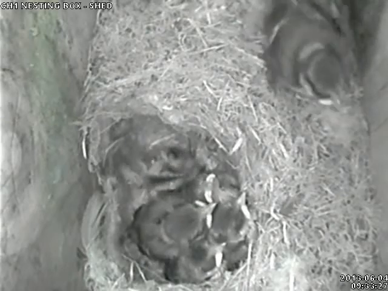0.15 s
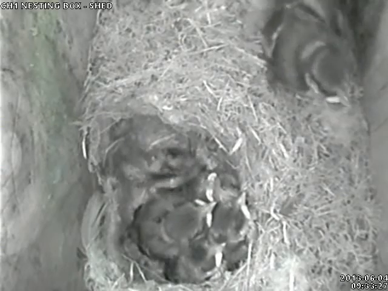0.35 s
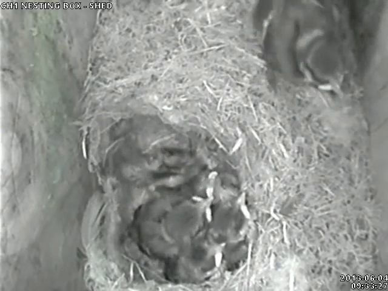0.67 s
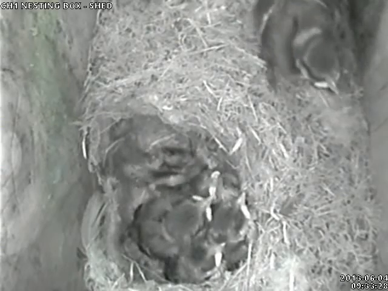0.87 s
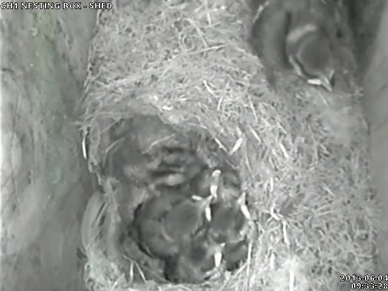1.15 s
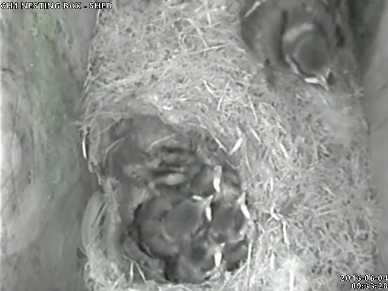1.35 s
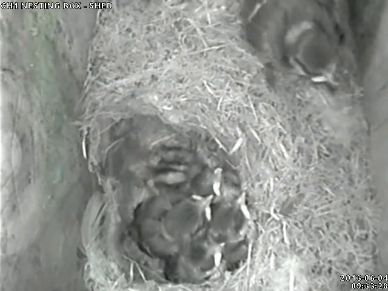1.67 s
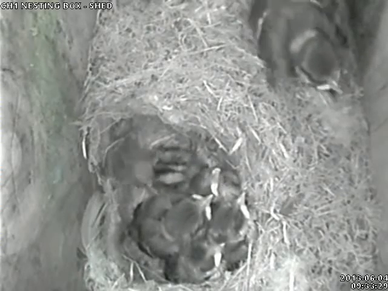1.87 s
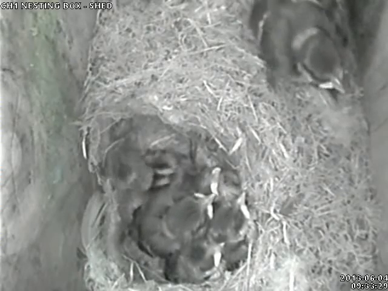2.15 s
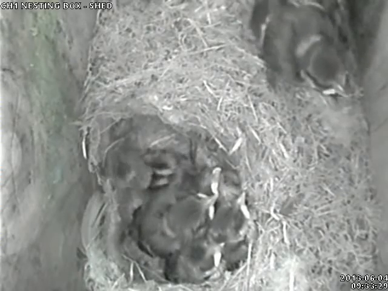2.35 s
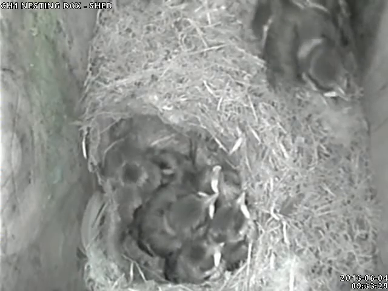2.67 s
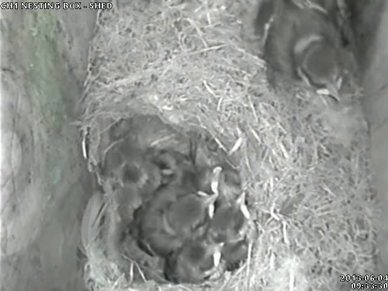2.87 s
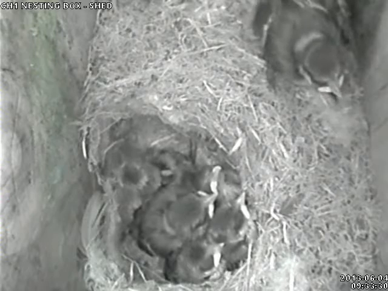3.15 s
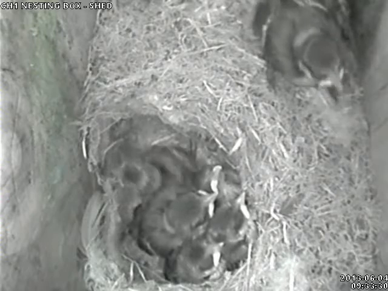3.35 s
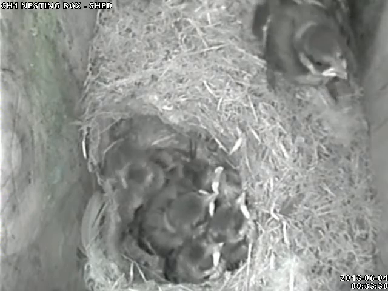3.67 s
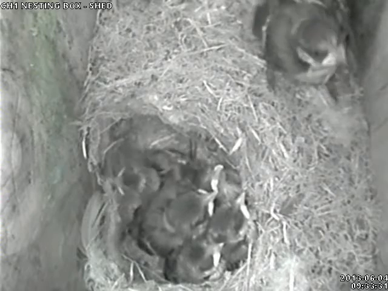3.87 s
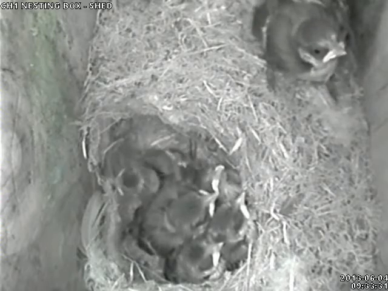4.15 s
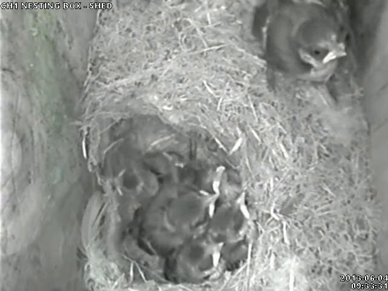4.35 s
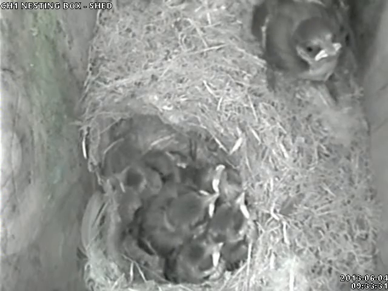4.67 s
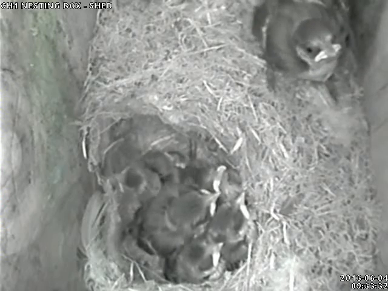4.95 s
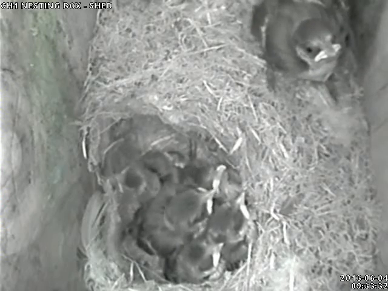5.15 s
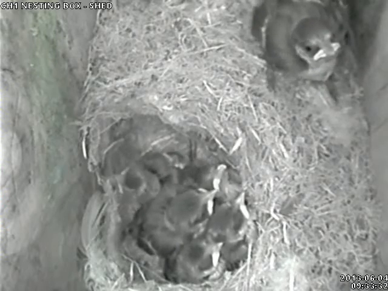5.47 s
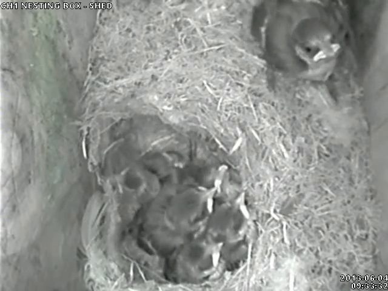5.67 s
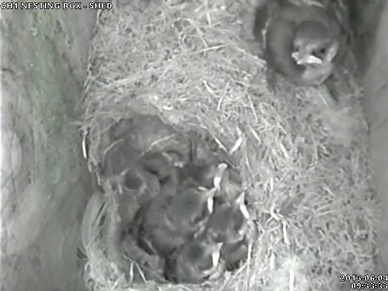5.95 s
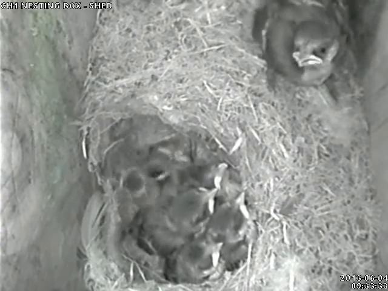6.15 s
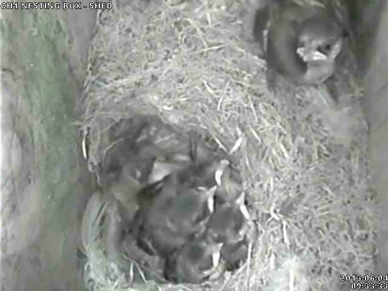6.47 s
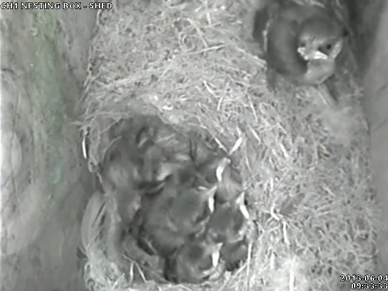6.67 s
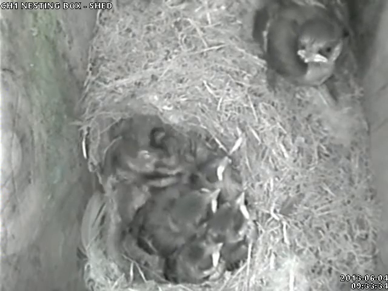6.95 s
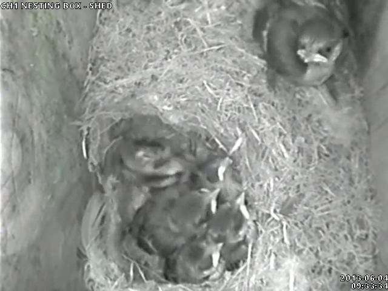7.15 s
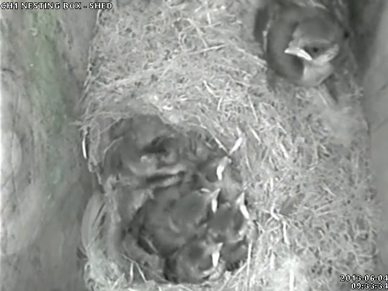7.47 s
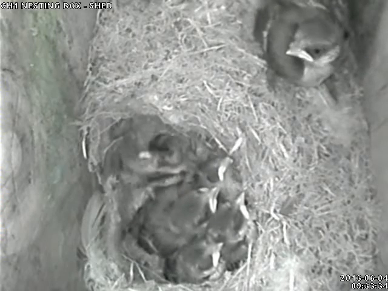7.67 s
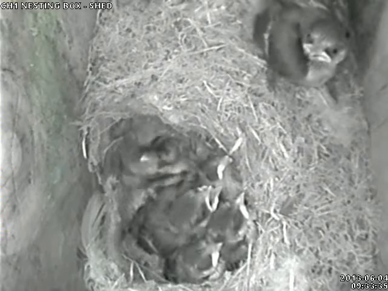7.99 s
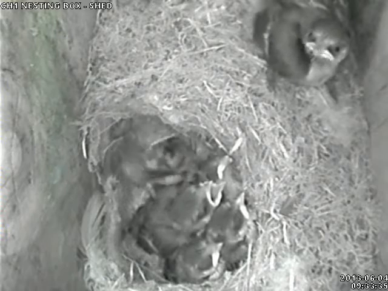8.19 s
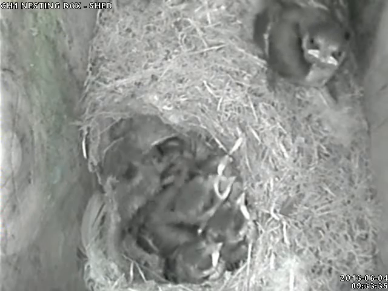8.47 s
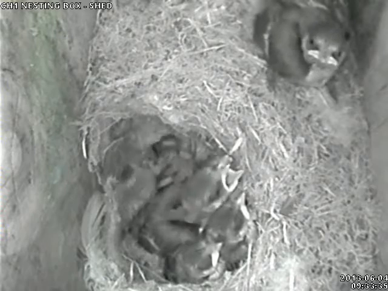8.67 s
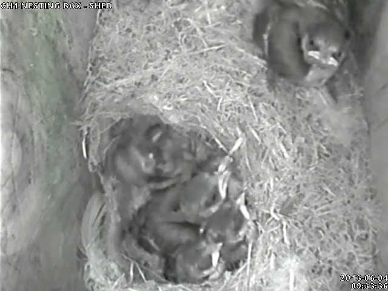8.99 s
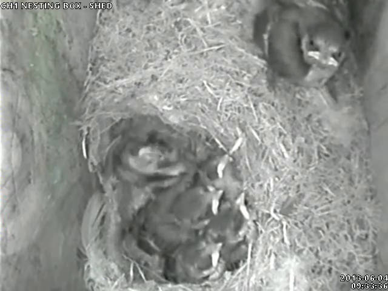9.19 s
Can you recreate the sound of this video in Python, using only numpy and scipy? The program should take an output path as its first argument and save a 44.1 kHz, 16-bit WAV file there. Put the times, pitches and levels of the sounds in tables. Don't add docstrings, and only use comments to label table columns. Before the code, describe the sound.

Hoarse chick calls and thin piping peeps come in clusters close to a buzzing little microphone, with faint coos and late bird trills beyond.

```python
import sys
import numpy as np
from scipy import signal
from scipy.fft import rfft, irfft
from scipy.io import wavfile
from scipy.ndimage import uniform_filter1d

SR = 44100
rng = np.random.default_rng(int(sys.argv[2]) if len(sys.argv) > 2 else 0)


def output_pcm(signal):
    pcm = np.clip(np.atleast_2d(signal).T, -1, 1) * 32767
    wavfile.write(sys.argv[1], SR, np.round(pcm).astype(np.int16))


def volts_from_db(level):
    exponent = np.asarray(level, float) / 20
    return 10 ** exponent


N = 411012

# centre_hz, width_hz, level_db
BOX = [(864, 133, 6), (1045, 170, 0.5), (1309, 210, 1.5), (1700, 430, -7), (8500, 4100, -12),
       (8600, 710, -17.5)]
# centre_hz, width_hz, level_db
THROAT = [(3400, 280, 0), (3950, 300, 0), (4450, 280, -3), (4870, 260, 0), (5430, 440, -5)]
# centre_hz, width_hz, level_db
BEAK = [(6280, 420, -3), (7050, 400, 0), (7680, 450, -5)]
# start_s, length_s, effort_db, beak_hiss_db, gape_hz (centre of the throat hiss)
HOARSE = [(0, 0.072, -55.5, -57.5, 3640), (0.146, 0.077, -53, -56.5, 3760), (0.291, 0.096, -52, -52, 3880),
          (0.422, 0.1, -51.5, -53, 4200), (0.572, 0.12, -53.5, -55, 4090), (1.073, 0.043, -58.5, -57, 3620),
          (1.823, 0.068, -59.5, -59, 3550), (1.999, 0.041, -58, -56, 3760),
          (2.218, 0.064, -59, -56.5, 3800), (2.43, 0.056, -53.5, -60, 4730),
          (3.049, 0.076, -54.5, -56.5, 3670), (3.439, 0.082, -57, -57.5, 3800),
          (3.619, 0.08, -52.5, -53, 4040), (3.751, 0.076, -50, -50.5, 4200), (3.887, 0.11, -50, -58, 4100),
          (5.432, 0.052, -54.5, -57.5, 4070), (6.161, 0.071, -52, -53.5, 4300),
          (6.303, 0.082, -50, -51, 4200), (6.439, 0.074, -49, -50, 4430), (6.593, 0.099, -48, -51, 4470),
          (7.828, 0.075, -55, -60.5, 4300), (7.993, 0.087, -50.5, -52.5, 4250),
          (8.123, 0.089, -51, -54, 4200), (8.271, 0.11, -52.5, -54.5, 4280)]
# start_s, length_s, middle_hz, level_db, squeak_db
GROPES = [(1.006, 0.019, 4860, -37, -41), (1.175, 0.046, 4410, -42, -48), (1.446, 0.036, 4500, -41.5, -46),
          (2.633, .045, 4770, -43, -50), (2.836, .053, 4800, -43, -48), (3.101, 0.039, 4810, -38.5, -49),
          (4.077, 0.034, 4790, -38, -66), (4.252, 0.041, 4830, -41, -57), (4.561, 0.028, 4840, -40, -49),
          (4.839, 0.012, 4860, -33, -51), (6.838, 0.02, 5000, -40.5, -51.5), (7.123, 0.014, 4870, -40, -53)]
# start_s, length_s, pitch_hz, level_db
HOLDS = [(1.212, 0.03, 4890, -37), (1.478, 0.041, 4824, -35), (2.677, 0.014, 5000, -39.5),
         (2.897, 0.015, 4780, -34), (3.132, 0.045, 5010, -39), (4.097, 0.027, 5110, -42),
         (4.289, 0.038, 4870, -34.5), (4.596, 0.025, 4850, -36.5), (4.858, 0.043, 4940, -36),
         (6.857, 0.059, 4900, -34), (7.135, 0.014, 4870, -33.5), (7.147, 0.05, 4920, -34.5)]
# start_s,
# length_s, first_hz, last_hz, level_db
SLIDES = [(2.033, .021, 3300, 3330, -53), (2.055, .013, 4050, 3200, -54), (.033, .022, 3350, 3300, -53),
          (2.462, .012, 4400, 6000, -44), (3.482, .022, 3300, 3330, -52), (3.796, .017, 3700, 7400, -40),
          (3.478, .025, 7550, 6950, -48), (.453, .034, 7200, 6850, -44), (4.129, .011, 6600, 6450, -63),
          (4.142, .024, 6270, 6230, -59), (4.126, .01, 4500, 3900, -56), (5.46, .02, 4000, 3200, -58),
          (6.492, .017, 3600, 7600, -39), (6.2, .024, 4600, 3700, -50), (7.865, .024, 3750, 3430, -54),
          (6.667, .013, 6100, 6900, -45.5), (.245, .025, 5900, 6200, -63), (6.083, .014, 6400, 6200, -62),
          (7.886, .021, 3800, 3500, -55), (8.185, .014, 3700, 5500, -46), (8.04, .026, 4100, 3700, -48),
          (8.297, .053, 7150, 6800, -45), (8.31, .05, 3550, 3300, -52), (4.817, .027, 3600, 3750, -54),
          (4.82, .02, 4450, 4550, -55), (.31, .045, 3400, 3250, -54), (.445, .05, 3450, 3280, -53),
          (5.44, .02, 4600, 4100, -56)]
GAPE_MID_HZ = 4100
ATTACK, RELEASE = 0.19, 0.13
BUZZ_DEPTH = 0.25


def level(x, db):
    return x * volts_from_db(db) / np.sqrt(np.mean(x ** 2))


def noise():
    return rng.standard_normal(N)


def ring(x, modes):
    out = 0
    for hz, width, db in modes:
        sos = signal.butter(2, [hz - width / 2, hz + width / 2], "bandpass", fs=SR, output="sos")
        out = out + volts_from_db(db) * signal.sosfilt(sos, x) / np.sqrt(width)
    return out


def wander(rate):
    k = int(SR / rate)
    return level(uniform_filter1d(uniform_filter1d(noise(), k), k), 0)


def colour(points):
    hz, db = np.transpose(points)
    bins = np.fft.rfftfreq(N, 1 / SR) + 1
    return irfft(rfft(noise()) * volts_from_db(np.interp(np.log(bins), np.log(hz), db)), N)


def add(track, start, piece):
    a = max(start, 0)
    piece = piece[..., a - start:N - start]
    track[..., a:a + piece.shape[-1]] += piece


def background():
    # pitch_hz, density_db
    floor = [(12, -50), (20, -19.5), (33, -31), (201, -15.5), (320, -30), (455, -29), (597, -33),
             (827, -32), (1500, -37.5), (4000, -43), (7070, -38.5), (7880, -33), (13200, -64.5)]
    # time_s, level_db
    traffic = [
        (0.0, -60),
        (2.44, -60),
        (6.5, -60.5),
        (8.2, -56),
        (8.9, -55),
        (9.32, -57),
    ]
    # time_s, over_ticking_db
    rustles = [
        (.141, 14),
        (7.57, 10),
        (7.785, 8),
        (9.09, 9),
        (9.24, 14),
    ]
    t = np.arange(N) / SR
    road = level(ring(noise(), [(145, 135, -1.5), (174, 101, 1.5), (249, 118, -11.5)]), 0)
    rumble = road * volts_from_db(np.interp(t, *np.transpose(traffic)) - 3)
    lorry = level(ring(noise(), [(71, 34, 0)]), -66) * volts_from_db(-2.5 * np.clip(t - 4.4, 0, 3.2))
    stir = volts_from_db(5 * np.abs(wander(30)))
    for moment, db in rustles:
        stir = stir + volts_from_db(db + 5) * np.exp(-((t - moment) / 0.01) ** 2)
    straw = level(ring(noise() * stir, BOX), -73.5)
    return level(colour(floor), -59.5) + lorry + rumble + straw


def camera():
    # pitch_hz, level_db
    hum_tones = [(50, -69), (200, -75), (300, -81), (350, -79.5), (450, -87)]
    # centre_hz, width_hz, level_db
    whine_bands = [(4090, 790, -70.5), (7580, 360, -75.5), (7920, 410, -75.5), (11470, 1950, -72)]
    t = np.arange(N) / SR
    hum = sum(np.sqrt(2) * volts_from_db(db) * np.sin(2 * np.pi * (hz * t + rng.random())) for hz, db in hum_tones)
    whine = sum(level(ring(noise(), [(hz, width, 0)]), db) for hz, width, db in whine_bands)
    count = N // 400
    scatter_db = 3.5 * np.tanh(rng.standard_normal(count))
    swing_db = 7 * (-1.0) ** np.arange(count)
    size = volts_from_db(scatter_db + swing_db)[(t * 100).astype(int)]
    place = t * 100 % 1
    sparks = size * np.exp(-((place - 0.52) / 0.08) ** 2) * noise()
    return hum + whine + level(ring(sparks, [(11500, 3200, 0)]), -75.5)


def calls():
    # start_s, length_s, effort_db, throat_db, beak_hiss_db
    piping = [(0.758, 0.029, -60, -58.5, -65), (1.004, 0.035, -51.5, -45.5, -60),
              (1.156, 0.09, -52, -46.5, -62), (1.431, 0.098, -50, -48.5, -68),
              (2.609, 0.093, -51, -49, -59.5), (2.815, 0.11, -50.5, -47, -63),
              (3.091, 0.078, -58.5, -57, -64), (4.058, 0.072, -53, -51.5, -67),
              (4.24, 0.081, -53.5, -49.5, -64), (4.546, 0.088, -54.5, -47, -68),
              (4.795, 0.11, -54, -52.5, -61), (6.805, 0.092, -58, -56, -65), (7.118, .053, -54.5, -54, -67)]
    # start_s, length_s, effort_db, hiss_db
    gasps = [
        (0.206, 0.072, -62, -71),
        (0.715, 0.04, -63.5, -64),
        (0.971, 0.025, -60, -62),
        (1.04, 0.049, -68, -63.5),
        (1.68, 0.017, -57.5, -68),
        (2.047, 0.024, -62, -63),
        (7.772, .024, -63, -72),
        (8.483, 0.052, -66, -69.5),
        (8.79, 0.014, -62, -72),
    ]
    rows = []
    for start, length, db, beak_db, gape_hz in HOARSE:
        throat_db = db - 1 + 1.5 * (gape_hz - GAPE_MID_HZ) / 1000
        rows.append((start, length, db, throat_db, beak_db, gape_hz, 0.14, False))
    for start, length, db, throat_db, beak_db in piping:
        waits = [(grope[0] + 0.0045 - start) / length for grope in GROPES if start < grope[0] < start + length]
        rows.append((start, length, db, throat_db, beak_db, 4600, max([0] + waits), True))
    for start, length, db, hiss_db in gasps:
        rows.append((start, length, db, hiss_db - 0.5, hiss_db, 4200, 0, False))
    return rows


def shape(u, start, stop, attack, crest, rise, hold):
    place = (u - start) / (stop - start)
    return level(np.interp(place, [0, attack, crest, 1 - RELEASE, 1], [0, rise, 1, hold, 0]), 0)


def shares(modes, centre_hz, spread_hz, db):
    return level(np.exp(-0.5 * ((np.array(modes)[:, 0] - centre_hz) / spread_hz) ** 2), db)


def breaths():
    box_shape, beak_shape = (0.63, 0.72, 0.84), (0.53, 0.48, 0.33)
    throat_shape, piping_shape = (0.75, 0.4, 0.8), (1, 0.9, 0.35)
    push = np.zeros((2 + len(BEAK) + len(THROAT), N))
    for start, length, box_db, throat_db, beak_db, gape_hz, wait, piper in calls():
        u = np.linspace(0, 1, int(length * SR))
        if piper:
            throat = shape(u, wait, 1, 0.028, *piping_shape)
        else:
            throat = shape(u, wait, 0.93, ATTACK, *throat_shape)
        beak = shape(u, 0.07, 0.9, ATTACK / 2, *beak_shape)
        beak_hz = 6850 + 1.1 * (gape_hz - GAPE_MID_HZ)
        throat_spread_hz = 600 * (1 + piper / 2)
        add(push, int(start * SR), np.vstack([
            volts_from_db(box_db) * shape(u, 0, 0.94, ATTACK, *box_shape),
            np.outer(shares(BEAK, beak_hz, 1200, beak_db), beak),
            np.outer(shares(THROAT, gape_hz, throat_spread_hz, throat_db - 5), throat),
            piper * volts_from_db(box_db - 9) * shape(u, 0, 0.97, ATTACK, *box_shape)]))
    return push


def buzz():
    return 2 * np.pi * np.cumsum(560 + 70 * wander(69.9)) / SR


def flutter(hz, db):
    pitch = hz + 80 * wander(55) + 70 * wander(500)
    return level(np.sin(2 * np.pi * np.cumsum(pitch) / SR) * volts_from_db(7 * np.tanh(wander(140))), db)


def rasps(push, beat):
    slaps = (rng.random(N) < 1500 / SR) * volts_from_db(10 * rng.random(N)) * np.sign(noise())
    source = level(slaps, 0) * volts_from_db(2.16 * wander(83))
    box = level(ring(source + 0.82 * noise(), BOX) * volts_from_db(1.2 * wander(80)), 0) * push[0]
    box = box + level(ring(source + noise(), [(1257, 570, 0)]), 0) * push[-1]
    breathy = source + 1.2 * noise()
    voice = level(ring(breathy, [(5650, 500, 0)]), -11) * push[1]
    for (hz, width, db), air in zip(BEAK + THROAT, push[1:]):
        hiss = level(ring(breathy, [(hz, 1.15 * width, 0)]), db - 4.5)
        voice = voice + (hiss + flutter(hz, db - 2.5)) * air
    return box + voice * (1 + BUZZ_DEPTH * np.cos(beat))


def beak_shuts():
    rows = []
    for start, length, db, _, gape_hz in HOARSE:
        end = start + length
        if not any(start < t < end and last > 1.3 * first for t, _, first, last, _ in SLIDES):
            shut_db = db - 3 - 15 * (gape_hz - GAPE_MID_HZ) / 1000
            rows.append((end - 0.011 - 0.005, 0.011, 4050, 3700, 3200, shut_db))
    return rows


def whistle_scraps():
    # start_s, length_s, pitch_hz, level_db
    beak_scraps = [(.028, 0.033, 7150, -53), (.187, 0.026, 6120, -47.5), (.323, 0.014, 7230, -50),
                   (.654, 0.0071, 6860, -53), (.481, 0.018, 6300, -44), (.614, 0.028, 6500, -51),
                   (.618, .034, 8260, -56), (.644, 0.028, 6240, -46), (.738, 0.029, 7100, -49),
                   (1.19, .037, 7330, -59), (1.452, 0.017, 7280, -48), (2.021, 0.033, 7000, -46.5),
                   (2.635, 0.012, 7260, -48), (3.653, 0.021, 6190, -44), (3.77, 0.051, 6130, -48.5),
                   (3.912, .043, 6000, -51), (3.913, 0.049, 7000, -49), (3.956, 0.023, 6300, -48),
                   (4.559, 0.028, 7140, -57), (6.322, 0.014, 6990, -46), (6.47, .016, 6970, -42),
                   (6.601, 0.039, 6100, -50), (6.613, 0.026, 7000, -44), (7.857, 0.039, 7420, -44.5),
                   (8.04, 0.024, 7010, -48), (8.147, 0.041, 6730, -43.5), (6.18, 0.042, 7600, -51),
                   (6.325, 0.039, 6150, -51), (7.094, 0.013, 7150, -53), (3.066, .03, 6250, -55),
                   (6.455, .03, 6100, -49), (2.45, .02, 7500, -50.5), (1.845, 0.037, 6220, -56),
                   (2.24, 0.031, 6260, -51), (.33, .03, 6450, -50), (.345, .012, 8300, -62),
                   (.487, .012, 8250, -61)]
    # start_s, length_s, pitch_hz, level_db
    throat_scraps = [(.315, 0.011, 4000, -52), (1.85, .02, 3750, -53), (2.24, 0.023, 3700, -53),
                     (.66, .012, 4650, -51), (0.169, 0.03, 4000, -44.5), (0.343, 0.014, 4050, -37.5),
                     (.489, 0.0091, 4050, -34.5), (.497, 0.011, 3540, -52), (0.615, 0.04, 4090, -44),
                     (0.624, 0.047, 3360, -51), (.765, 0.015, 5320, -41), (1.03, 0.011, 4020, -38),
                     (1.226, 0.0088, 4100, -39), (1.24, .011, 3860, -44), (1.507, 0.021, 4040, -39),
                     (2.463, .018, 5000, -42), (2.616, 0.038, 4820, -46.5), (2.694, 0.0048, 4020, -39),
                     (2.826, 0.021, 4880, -48), (2.908, 0.017, 3840, -48), (3.654, 0.023, 3950, -44),
                     (3.898, .019, 5070, -45), (3.927, 0.022, 4630, -52), (3.948, 0.033, 4450, -46),
                     (4.61, .02, 3990, -43.5), (6.355, 0.015, 4270, -42), (6.483, 0.022, 4700, -46),
                     (6.658, 0.016, 4480, -41.5), (8.184, 0.011, 4610, -40), (8.343, 0.019, 4520, -40.5),
                     (7.855, .01, 4800, -58), (8.042, 0.0089, 4800, -50), (8.056, 0.0088, 4800, -47),
                     (6.638, 0.015, 4700, -43), (8.34, .016, 5100, -58), (7.893, .007, 4800, -56)]
    rows = []
    for start, length, hz, db in beak_scraps + throat_scraps:
        drift = 50 * rng.standard_normal() - 45
        bend = 45 * rng.standard_normal() + 45
        rows.append((start, length, hz - drift - bend, hz + bend / 2, hz + drift - bend, db))
    return rows


def whistle_notes():
    squeak_s, squeak_hz, dip_hz = 0.024, 7250, 120
    squeaks = [(start + 0.006 - squeak_s, squeak_s, squeak_hz + dip_hz, squeak_hz - dip_hz,
                squeak_hz - dip_hz / 2, db, -9) for start, _, _, _, db in GROPES]
    gropes = [(start, length, 5280, hz, 4900, db, -7) for start, length, hz, db, _ in GROPES]
    arch_hz = 65
    holds = [(start, length, hz - 2 * arch_hz, hz + arch_hz, hz - arch_hz, db) for start, length, hz, db in HOLDS]
    slides = [(start, length, first, first + 0.44 * (last - first), last, db)
              for start, length, first, last, db in SLIDES]
    steady = holds + whistle_scraps() + slides + beak_shuts()
    return squeaks + gropes + [(*row, 0) for row in steady]


def whistles(push, beat):
    rough = np.clip(push[0] / volts_from_db(-50), 0, 1.3)
    for start, length, _, _ in HOLDS:
        rough[int(start * SR):int((start + length) * SR)] *= 0.5
    steep = [row for row in SLIDES if row[3] > 1.3 * row[2]]
    for start, length, *_ in GROPES + steep:
        span = slice(int(start * SR), int((start + length) * SR))
        rough[span] = np.maximum(rough[span], 1.1)
    shake_hz = 75 * rough * wander(450) + 14 * wander(150) + 130 * rough * np.sin(beat)
    shake_db = (0.5 + 4 * rough) * (np.tanh(wander(340)) - 0.5)
    out, ends, edge = np.zeros(N), [], int(0.003 * SR)
    for start, length, first, middle, last, db, swell_db in whistle_notes():
        a, n = int(start * SR), int(length * SR)
        i = np.arange(-edge, n + edge)
        u = np.clip(i / n, 0, 1)
        hz = first + (4 * middle - 3 * first - last) * u + 2 * (first + last - 2 * middle) * u ** 2
        phase = 2 * np.pi * np.cumsum(hz + shake_hz[np.clip(a + i, 0, N - 1)]) / SR
        for end, end_hz, end_phase in ends:
            if abs(end - a) < edge and abs(end_hz - first) < 300:
                phase += end_phase + 2 * np.pi * first * (a - end) / SR - phase[edge]
        ends.append((a + n, last, phase[edge + n]))
        fade = np.clip(np.minimum(i + edge, n + edge - i) / (2 * edge), 0, 1)
        swell = volts_from_db(swell_db * np.clip(1 - i / (0.01 * SR), 0, 1))
        add(out, a - edge, np.sqrt(2) * volts_from_db(db) * fade * swell * np.sin(phase))
    return out * volts_from_db(shake_db) * (1 + BUZZ_DEPTH * rough * np.cos(beat))


def pigeon():
    # start_s, length_s, held_hz, last_hz, level_db
    coos = [
        (4.53, .22, 470, 360, -68),
        (5.14, .19, 475, 420, -66),
        (5.42, .33, 465, 365, -67),
        (6.72, .1, 450, 490, -72),
        (7.44, .24, 480, 370, -67),
        (8.06, .16, 480, 440, -68),
        (8.4, .35, 460, 350, -70),
    ]
    out, waver = np.zeros(N), wander(30)
    for start, length, held_hz, last_hz, db in coos:
        u = np.linspace(0, 1, int(length * SR))
        hz = held_hz + (last_hz - held_hz) * u ** 2.5 + 6 * waver[int(start * SR):][:len(u)]
        fade = signal.windows.tukey(len(u), 0.2)
        add(out, int(start * SR), np.sqrt(2) * volts_from_db(db) * fade * np.sin(2 * np.pi * np.cumsum(hz) / SR))
    return out * volts_from_db(3 * wander(40) - 2)


def trills():
    # start_s, length_s, first_hz, last_hz, level_db
    trill_rows = [
        (5.17, .04, 6700, 6500, -70),
        (7.785, .02, 6800, 6500, -63),
        (8.07, .035, 7000, 6600, -64),
        (8.215, .06, 6450, 6750, -65),
        (8.512, .148, 6520, 7200, -65),
        (8.805, .115, 6550, 6900, -64),
        (9.1, .095, 6500, 6950, -65),
    ]
    out = np.zeros(N)
    for start, length, first, last, db in trill_rows:
        t = np.arange(int(length * SR)) / SR
        warble_hz = 230 * (0.38 + t / 0.14) * np.sin(2 * np.pi * 44 * t)
        hz = first + (last - first) * t / length - warble_hz
        fade = np.sin(np.pi * t / length) ** 0.5
        add(out, int(start * SR), np.sqrt(2) * volts_from_db(db) * fade * np.sin(2 * np.pi * np.cumsum(hz) / SR))
    return out * volts_from_db(2.5 * wander(90))


def scene():
    push, beat = breaths(), buzz()
    outside = background() + pigeon() + trills()
    chicks = rasps(push, beat) + whistles(push, beat)
    mid = outside + camera() + chicks
    side = level(ring(noise(), [(61.3, 24, 9), (170, 19, 4.5), (273, 39, -43)]), -72)
    return np.array([mid + side, mid - side])


def roll_off(x):
    return signal.sosfilt(signal.butter(12, 13360, fs=SR, output="sos"), x)


def record(dry):
    top = signal.ellip(14, 0.5, 70, 12830, fs=SR, output="sos")
    mix = signal.sosfilt(top, dry) + np.array([0.01575, 0.0132])[:, None]
    return roll_off(mix)


dry = scene()
out = record(dry)
output_pcm(out)
```